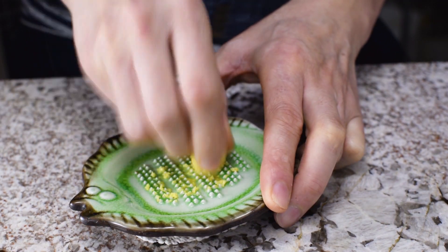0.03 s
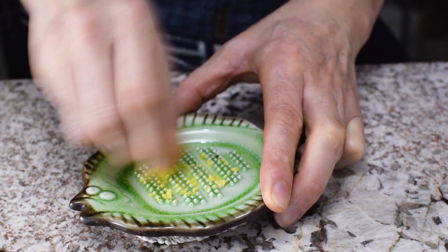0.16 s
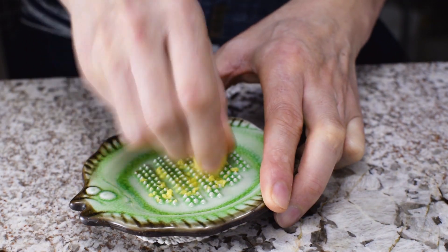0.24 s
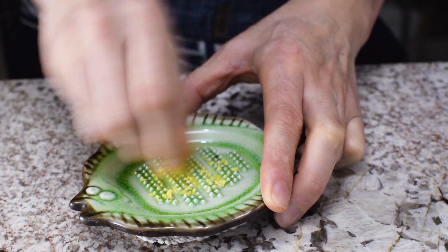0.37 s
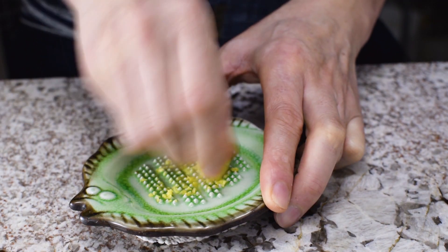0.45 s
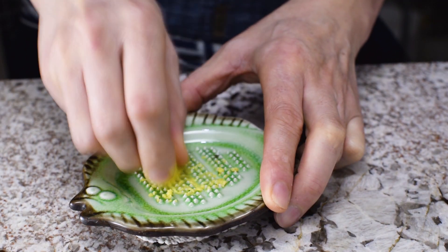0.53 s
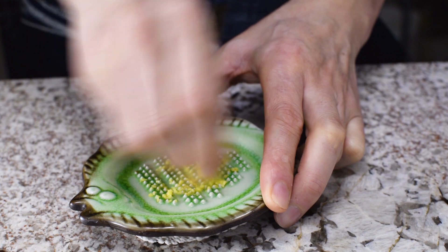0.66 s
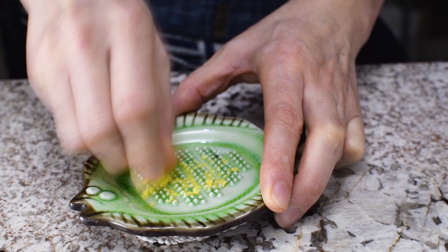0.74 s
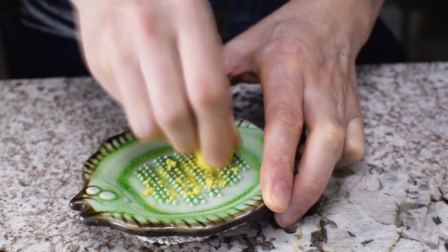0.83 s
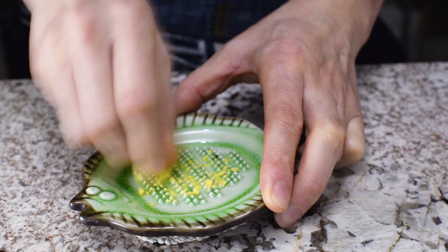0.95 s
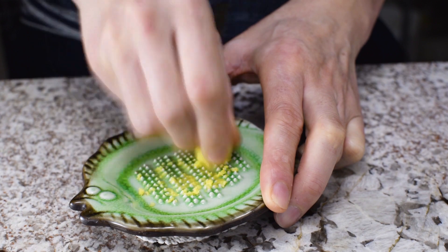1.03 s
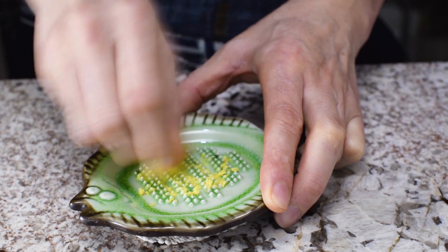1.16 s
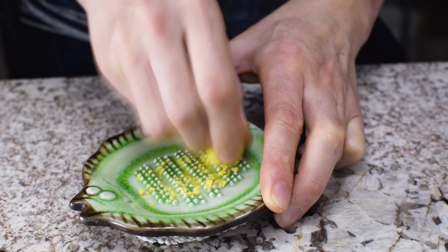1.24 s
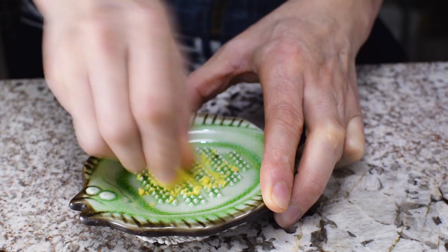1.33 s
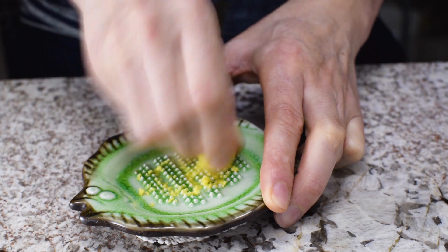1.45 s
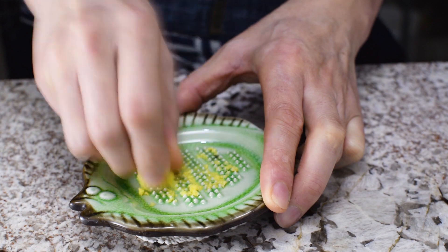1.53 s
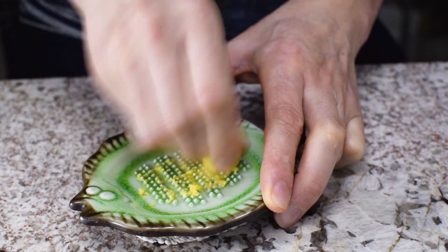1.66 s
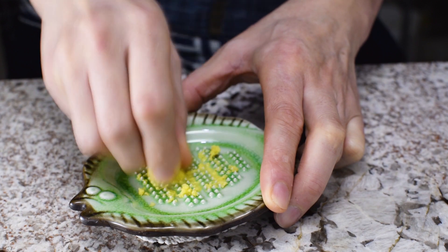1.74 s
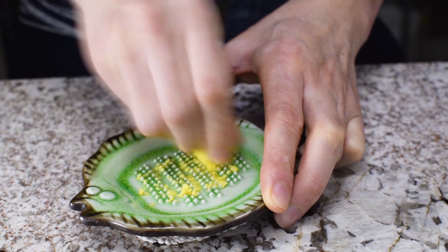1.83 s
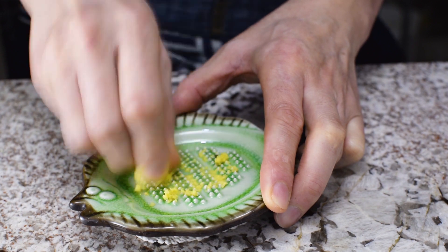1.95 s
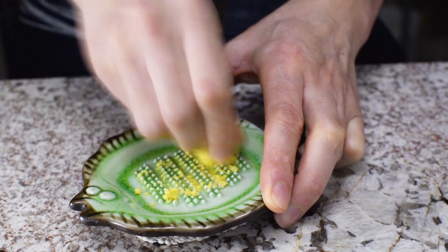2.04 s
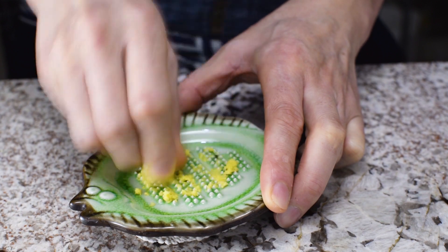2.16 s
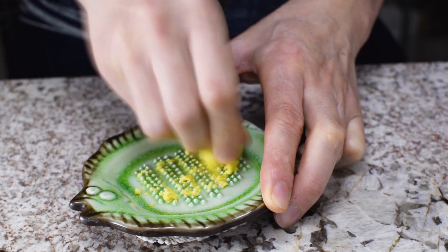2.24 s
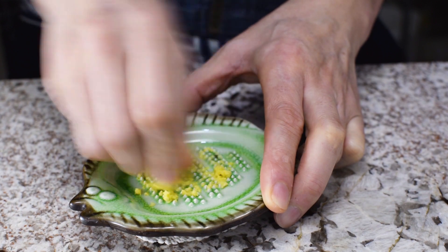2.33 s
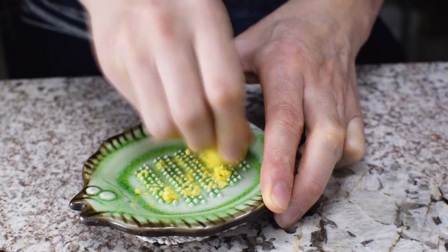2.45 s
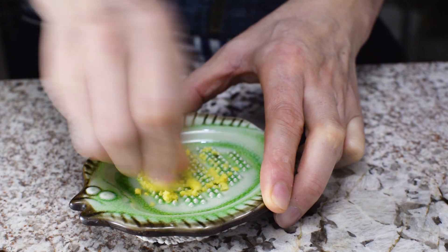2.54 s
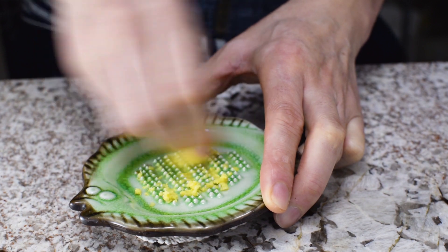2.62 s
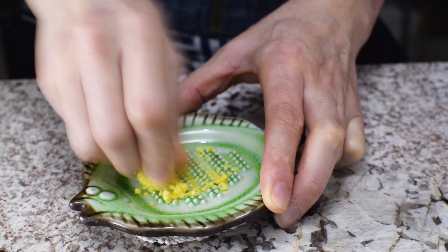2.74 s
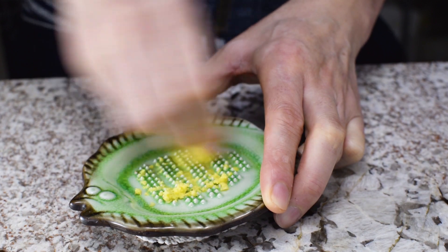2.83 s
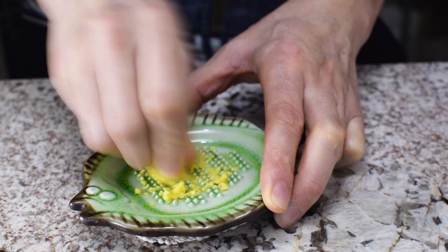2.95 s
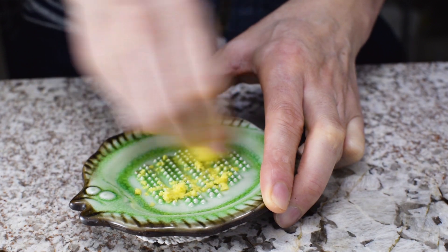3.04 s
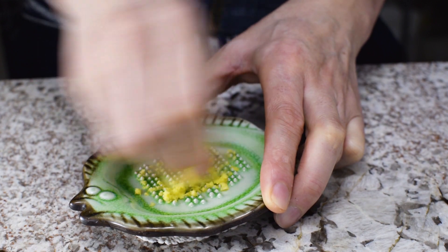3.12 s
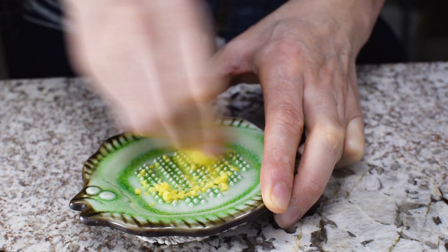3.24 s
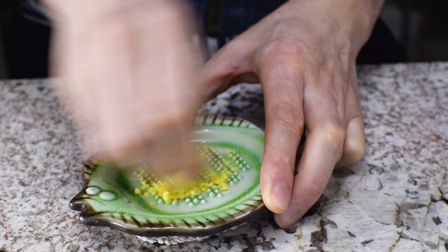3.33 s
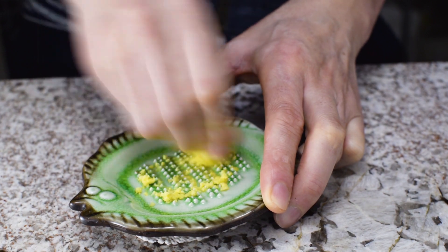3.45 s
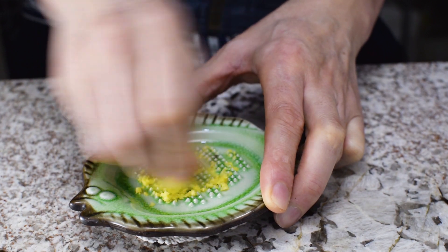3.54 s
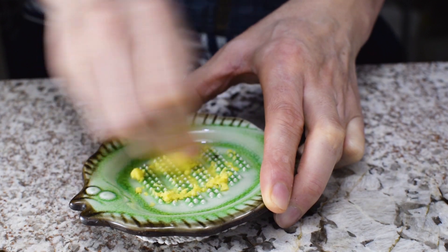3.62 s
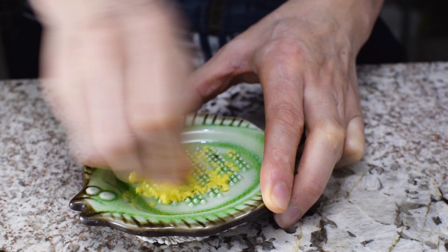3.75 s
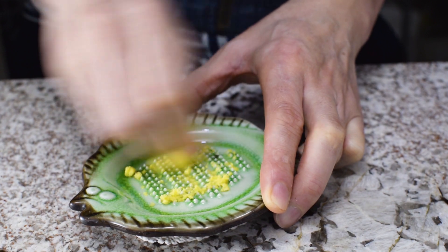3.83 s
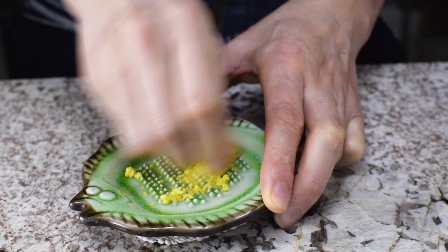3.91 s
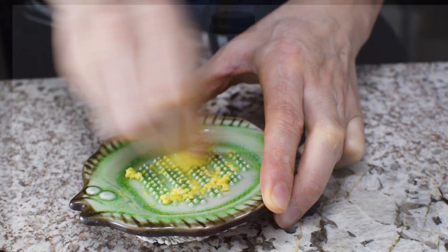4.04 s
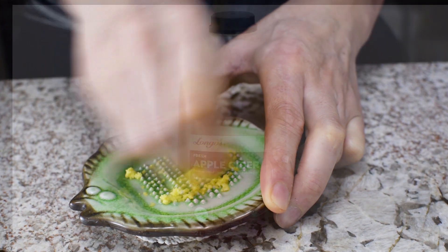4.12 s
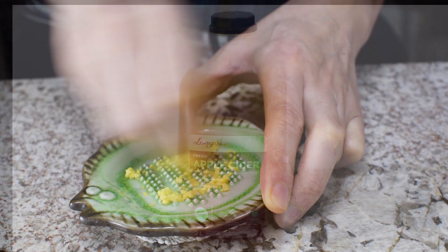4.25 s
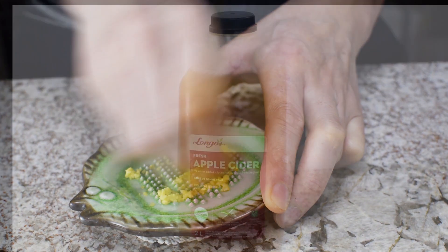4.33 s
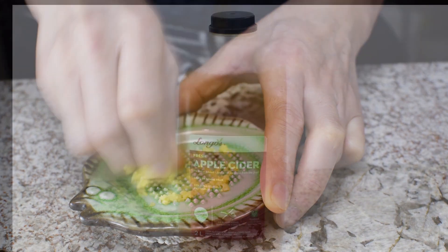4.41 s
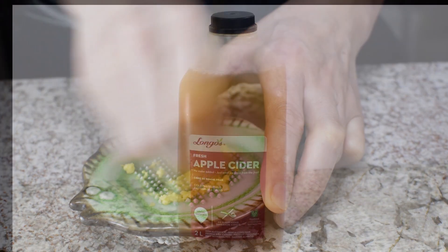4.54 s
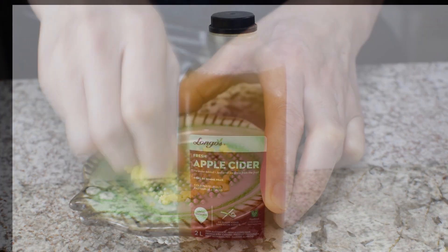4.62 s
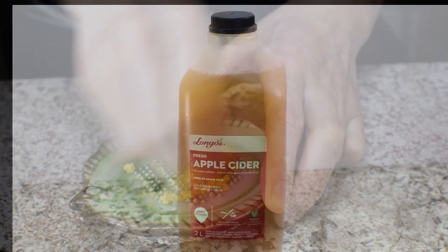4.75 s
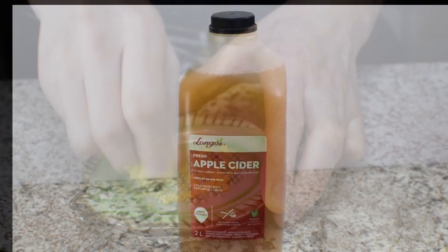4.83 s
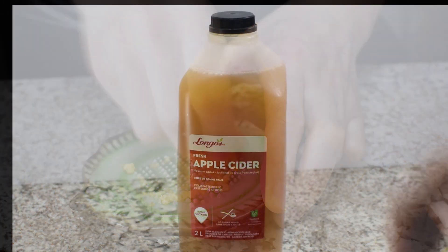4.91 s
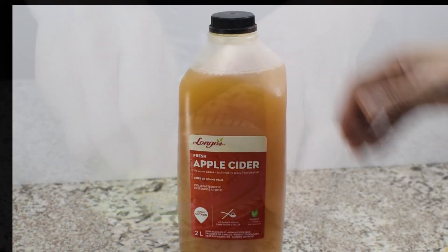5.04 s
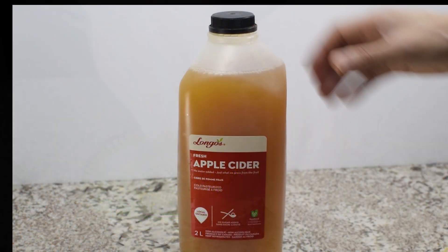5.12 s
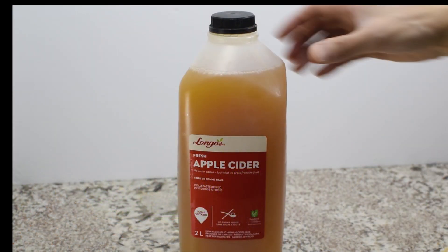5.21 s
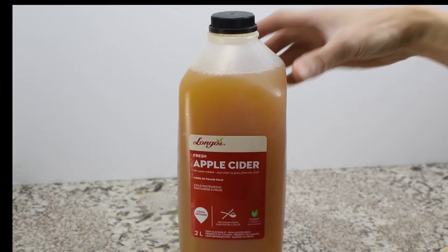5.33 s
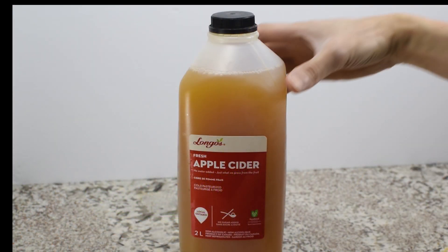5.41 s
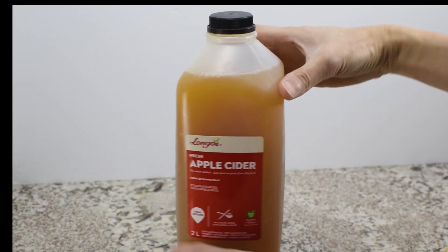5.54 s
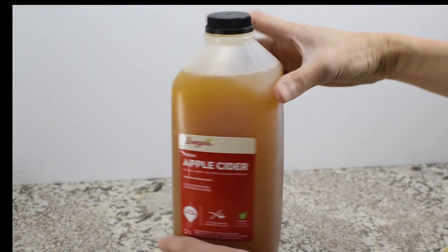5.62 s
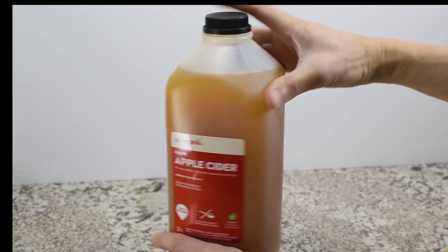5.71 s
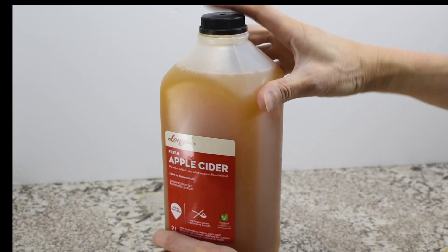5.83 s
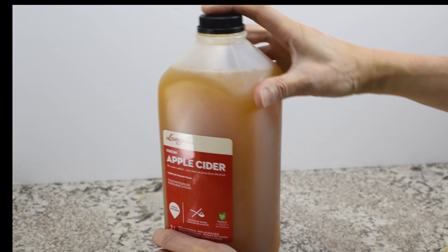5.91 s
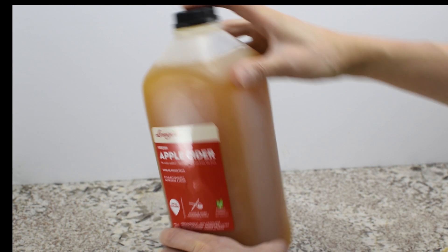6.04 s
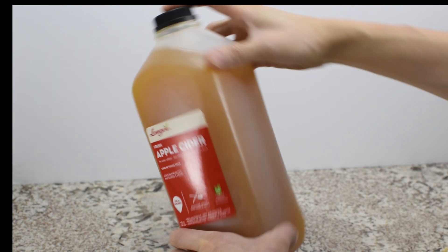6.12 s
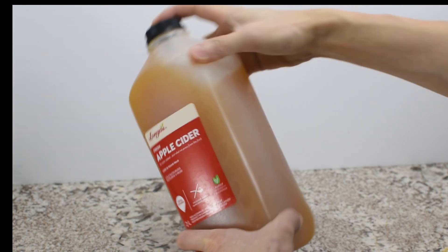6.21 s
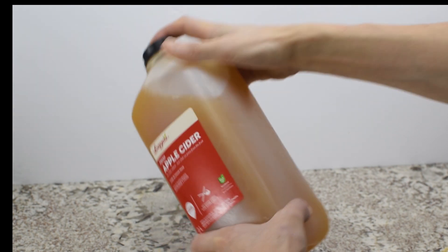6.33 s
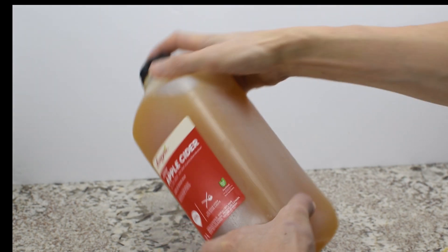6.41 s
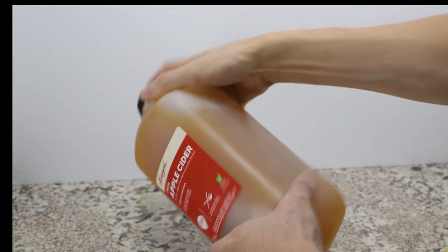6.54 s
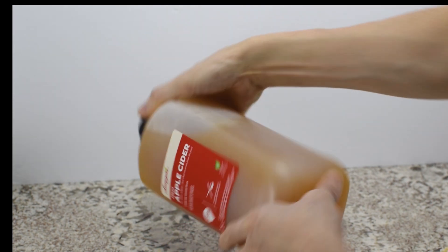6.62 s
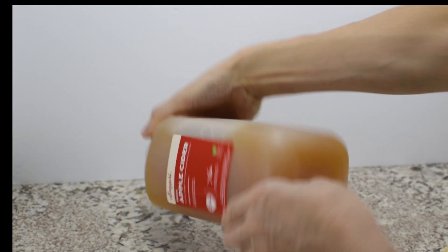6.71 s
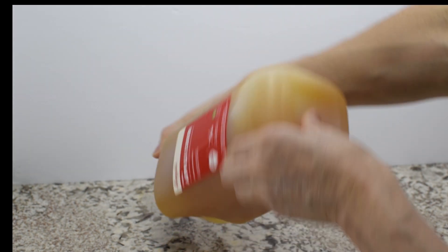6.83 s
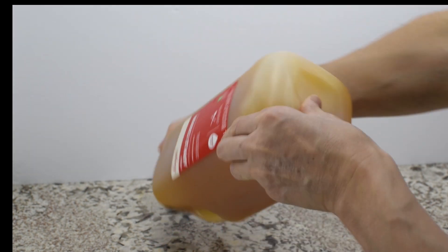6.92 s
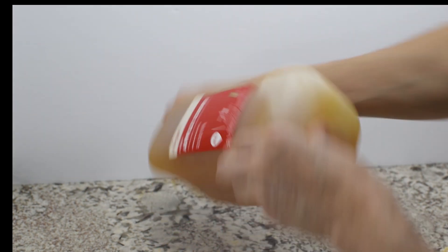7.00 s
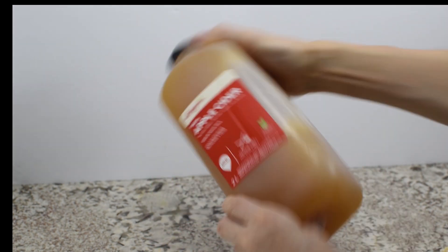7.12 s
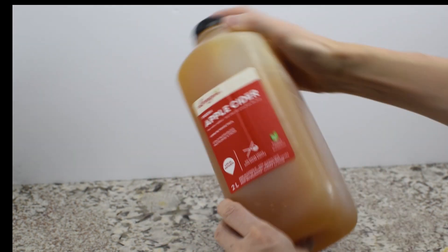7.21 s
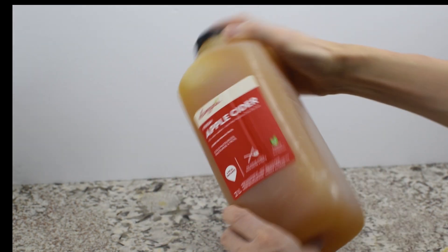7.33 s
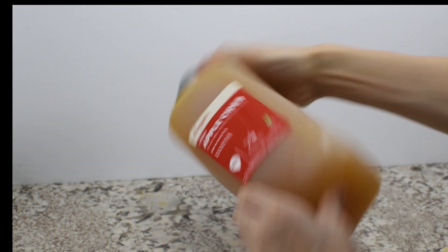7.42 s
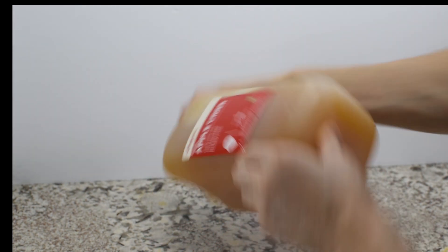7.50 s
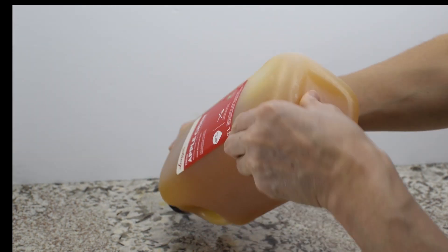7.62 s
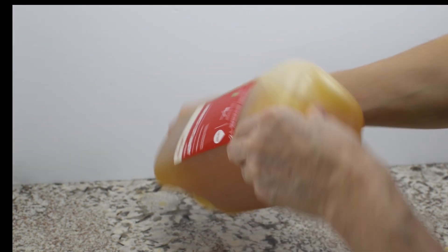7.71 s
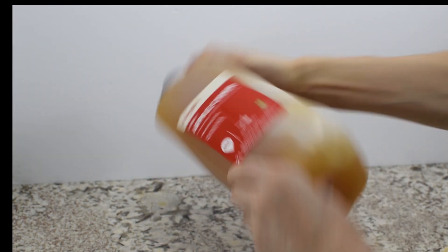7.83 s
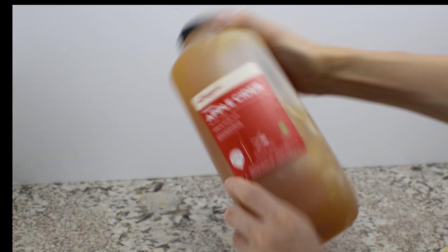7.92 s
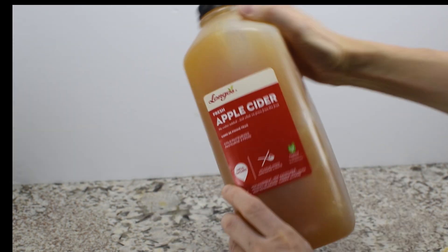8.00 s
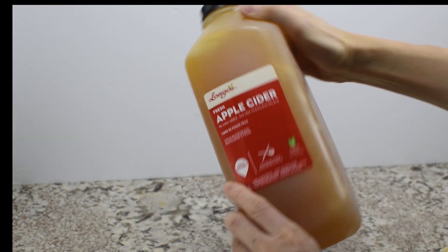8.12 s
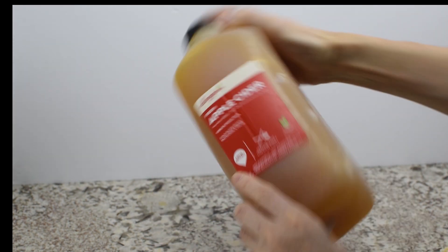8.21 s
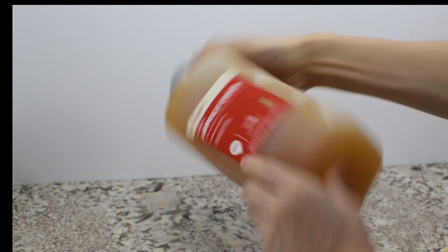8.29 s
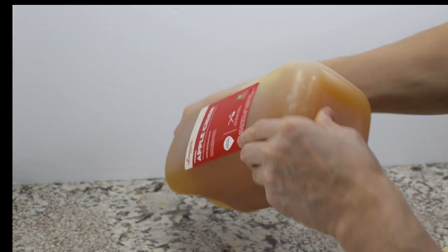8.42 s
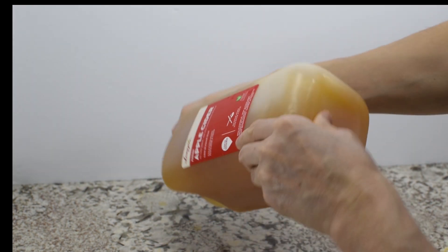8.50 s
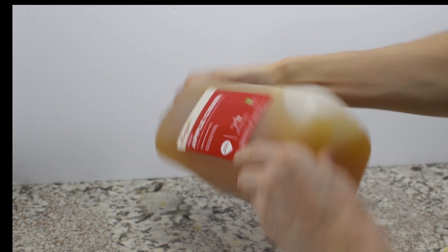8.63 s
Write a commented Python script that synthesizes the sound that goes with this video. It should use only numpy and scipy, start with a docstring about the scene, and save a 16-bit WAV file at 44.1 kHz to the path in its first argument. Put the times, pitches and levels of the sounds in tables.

```python
"""Grating ginger, then shaking cider

Ginger is rubbed quickly to and fro on a ceramic grater: noise and crackle make the tearing fibres,
resonances make the ringing and juddering dish, and clouds of small damped tones make the wet fizz.
The scene then changes abruptly to a quiet kitchen, where a plastic jug of cider is tipped over and shaken:
rising damped tones gulp and pop, noise bursts slap the walls, and swells of crackle make the spray.
A soft ventilation rumble of shaped noise runs under both."""
import sys
import numpy as np
from scipy import signal
from scipy.fft import rfft, irfft, next_fast_len
from scipy.io import wavfile
from scipy.ndimage import uniform_filter1d, map_coordinates

SR = 44100
rng = np.random.default_rng(int(sys.argv[2]) if len(sys.argv) > 2 else 0)


def bounce(signal):
    """Save signal as a 16-bit WAV file at the path given by the first command-line argument."""
    frames = np.transpose(np.atleast_2d(signal))
    limited = np.clip(frames, -1, 1)
    pcm = np.round(limited * 32767).astype(np.int16)
    wavfile.write(sys.argv[1], SR, pcm)


N = 381906
TOP_HZ = 15900  # nothing sounds above this
CHANGE_S = 4.612  # the grating has stopped by this time


def amp(db):
    """Decibels to gain."""
    return 10 ** (np.asarray(db) / 20)


def unit(x):
    """Scale x to an rms (average strength) of 1."""
    return x / np.sqrt(np.mean(x ** 2) + 1e-20)


def clock():
    """Time of every sample in seconds."""
    return np.arange(N) / SR


def along(points, hz):
    """Read a curve of (Hz, value) points, joined by straight lines on a log pitch axis."""
    f, v = np.transpose(points)
    return np.interp(np.log(hz + 1), np.log(f + 1), v)


def wobble(rate):
    """A smooth random curve with rate random points a second."""
    knots = rng.standard_normal(int(N * rate / SR) + 4)
    return map_coordinates(knots, [clock() * rate])


def filtered(x, response):
    """Multiply the spectrum of x by a response that depends on frequency."""
    size = 2 * next_fast_len((N + SR // 2) // 2)
    hz = np.fft.rfftfreq(size, 1 / SR)
    return irfft(rfft(x, size) * response(hz), size)[..., :N]


def coloured(x, spectrum):
    """Give x a (Hz, dB) tone colour without smearing it backwards in time."""
    def response(hz):
        cepstrum = irfft(np.log(amp(along(spectrum, hz)) + 1e-6))
        # folding the cepstrum forwards makes the filter act only after each sound
        cepstrum[1:len(hz) - 1] *= 2
        cepstrum[len(hz):] = 0
        return np.exp(rfft(cepstrum))
    return filtered(x, response)


def resonate(x, modes):
    """Let x ring a body with (Hz, width Hz, dB) resonances of alternating sign."""
    def response(f):
        total = 0
        for k, (centre, width, db) in enumerate(modes):
            damping = 1j * f * width
            total = total + (-1) ** k * amp(db) * damping / (centre * centre - f * f + damping)
        return total
    return filtered(x, response)


def add(track, s, sound):
    """Mix a sound into the track at time s."""
    start = max(round(s * SR), 0)
    track[start:start + len(sound)] += sound[:max(N - start, 0)]


def crackle(rate, spread_db):
    """Random clicks of uneven size, about rate a second, rms 1."""
    sizes = amp(spread_db * np.clip(rng.standard_normal(N), -2, 2)) * rng.choice([-1, 1], N)
    return unit(sizes * (rng.random(N) < rate / SR))


def ping(t, hz, t60, attack, glide):
    """A bubble: a damped sine whose pitch rises as it dies by 60 dB in t60."""
    tone = np.sin(2 * np.pi * hz * t * (1 + glide * np.minimum(t / t60, 1)))
    return tone * 10 ** (-3 * t / t60) * (1 - np.exp(-t / attack))


def fizz(count, hz, octaves, cycles, spread_db):
    """A cloud of small bubbles at random times and pitches, rms 1."""
    t = np.arange(600) / SR
    pitch, size = np.clip(rng.standard_normal((count, 2)), -2, 2).T[:, :, None]
    pitch = np.minimum(hz * 2 ** (octaves * pitch), TOP_HZ)
    grains = amp(spread_db * size) * ping(t, pitch, cycles / pitch, 1 / pitch, 0.075)
    places = rng.integers(0, N, (count, 1)) + np.arange(len(t))
    return unit(np.bincount(places.ravel(), grains.ravel(), N)[:N])


def pops(rows, cycles, glide, scatter_db):
    """Single bubbles, each ringing for some cycles and shedding four fainter ones, lower or higher."""
    out, t = np.zeros(N), np.arange(SR // 20) / SR
    for s, db, hz in rows:
        pop = ping(t, hz, cycles / hz, 2 / hz, glide)
        add(out, s, amp(db) * pop / np.abs(pop).max())
        for late, octave in rng.random((4, 2)):
            pitch = min(hz * 2 ** (1.51 * octave - .55), TOP_HZ)
            small = ping(t, pitch, cycles / pitch, 1 / pitch, glide)
            add(out, s + 0.013 * late ** 2, amp(db + scatter_db) * small)
    return out


def burst(t60):
    """A short crack of noise that dies by 60 dB in t60."""
    t = np.arange(SR // 20) / SR
    return rng.standard_normal(len(t)) * 10 ** (-3 * t / t60)


def echoes(x, decay, delay):
    """Blurred reflections: x spread over a dying noise tail of unit energy."""
    hz, t, z = signal.stft(rng.standard_normal(SR // 2), SR, nperseg=256)
    dying = z * amp(-60 * t / along(decay, hz)[:, None])
    tail = signal.istft(dying, SR, nperseg=256)[1]
    tail = np.pad(tail / np.linalg.norm(tail), (round(delay * SR), 0))
    return signal.fftconvolve(x, tail)[:N]


def shifting_echoes(x, decay, rate, count):
    """Reflections off moving surfaces: several echo patterns fade in and out."""
    shares = np.array([wobble(rate) for _ in range(count)])
    shares /= np.linalg.norm(shares, axis=0)
    return sum(share * echoes(x, decay, delay=.0004) for share in shares)


def patchy(x, depth_db):
    """The colour flickers: each region of pitch swells on its own."""
    z = signal.stft(x, nperseg=256)[2]
    smoothing = np.outer(np.hanning(9), np.hanning(17))
    field = signal.fftconvolve(rng.standard_normal(z.shape), smoothing, "same")
    return signal.istft(z * amp(depth_db * unit(field)), nperseg=256)[1][:N]


def stereo(mid, side):
    """Left and right from the shared middle and the difference between the sides."""
    return np.array([mid + side, mid - side])


# tone colour of the ventilation: (pitch [Hz], relative level [dB])
VENTILATION_COLOUR = [(4.7, -39.5), (8.0, 5.5), (19, 0.5), (38, -16), (69, -11), (139, -21), (169, -19),
                      (211, -22.5), (289, -26), (339, -27), (466, -28.5), (620, -32), (1250, -37.5),
                      (3230, -47.5), (15800, -58.5)]
# how wide it sounds: (pitch [Hz], side level against the middle [dB])
VENTILATION_WIDTH = [(20, -31.5), (45, -18), (70, -12.5), (110, -7.5), (160, -11), (500, -8.5), (900, -12),
                     (4000, -6.5), (9000, -6)]


def ventilation():
    """Moving air: steady noise shaped into a soft rumble with a little hiss."""
    mid, side = (unit(coloured(noise, VENTILATION_COLOUR)) for noise in rng.standard_normal((2, N)))
    side = filtered(side, lambda hz: amp(along(VENTILATION_WIDTH, hz)))
    return amp(-39.0) * stereo(mid, side)


# fingers touching the plastic: (time [s], level [dB], time to fade by 20 dB [s])
FINGER_TOUCHES = [(5.417, -54.5, 0.058), (5.48, -66, 0.38), (5.55, -71, 0.41), (6.28, -61, .02),
                  (6.345, -60, .05)]


def fingers():
    """Skin brushes the jug as the hands take hold: fine crackle that starts at once and fades."""
    touch = np.zeros(N)
    for s, db, fade in FINGER_TOUCHES:
        touch += amp(db - 20 * np.abs(clock() - s) / fade) * (clock() > s)
    colour = [(600, -6), (1400, 2), (2600, 2), (6000, -6), (15000, -27)]
    return touch * unit(coloured(crackle(rate=3000, spread_db=2), colour))


# air pockets gulping through the liquid: (time [s], level [dB], pitch [Hz])
AIR_GULPS = [(6.647, -37, 437), (6.649, -32, 1050), (7.072, -27.5, 228), (7.074, -26.5, 647),
             (7.074, -28.5, 300), (7.081, -29.5, 795), (7.083, -29.5, 1080), (7.089, -29.5, 196),
             (7.091, -26, 605), (7.531, -29, 1190), (7.92, -30, 656), (7.929, -31.5, 527),
             (8.368, -31.5, 206), (8.378, -29, 312), (8.455, -37, 1024), (8.629, -35, 640),
             (8.633, -41, 1650)]
# bubbles and drops in the jug: (time [s], relative level [dB], pitch [Hz])
SMALL_DROPS = [(6.651, -21.5, 4000), (6.8366, -39, 5400), (6.91, -30.5, 3540), (7.0888, -23.5, 3800),
               (7.1014, -20, 4100), (7.1354, -22, 2660), (7.4849, -31, 2410), (7.503, -25, 1340),
               (7.5715, -15.5, 3650), (7.582, -29, 1980), (7.65, -28, 2590), (7.662, -36, 1730),
               (7.854, -32, 2910), (7.903, -25, 1740), (8.1469, -30.5, 4500), (8.2387, -25, 5160),
               (8.328, -26.5, 4600), (8.4194, -23, 3280), (8.4835, -21.5, 2610), (8.5276, -32, 4030),
               (8.5626, -34.5, 5500), (8.6078, -29.5, 8900)]
GULP_T60_S, GULP_REF_HZ, GULP_SLOPE = 0.072, 600, 0.37  # larger, lower pockets ring longer


def bubbles():
    """Large air pockets gulp as low damped tones; small bubbles and drops plink."""
    gulps, t = np.zeros(N), np.arange(SR // 4) / SR
    for s, db, hz in AIR_GULPS:
        t60 = GULP_T60_S * (GULP_REF_HZ / hz) ** GULP_SLOPE
        add(gulps, s, amp(db) * ping(t, hz, t60, attack=0.00053, glide=0.014))
    drops = amp(-3) * pops(SMALL_DROPS, cycles=26, glide=0.035, scatter_db=-5.5)
    reflected = amp(-9) * echoes(drops, [(1500, 0.047), (8000, 0.025)], delay=0.001004)
    return gulps + drops + reflected


# sharp slaps on the plastic: (time [s], relative level [dB], pitch [Hz], extra level of the crack [dB])
WALL_SLAPS = [(6.6481, -15, 2610, -2.5), (7.114, -7.5, 3040, -8), (7.5364, -22, 4340, 9.5),
              (7.927, -9, 3800, -11), (8.0271, -12.5, 2580, -2.5), (8.3689, -11, 3180, -3.5)]
# tone colour of slaps and spray: (pitch [Hz], relative level [dB])
SPRAY_COLOUR = [(700, -45), (1300, -5.5), (1900, -5), (2500, 0), (3800, -2), (4800, -2), (7000, -6),
                (10500, -14.5), (12000, -23), (15500, -42)]


def slaps():
    """Liquid meets the wall flat on: a crack of noise and a pitched pop."""
    cracks = np.zeros(N)
    for s, db, hz, crack_db in WALL_SLAPS:
        add(cracks, s, amp(db + crack_db) * burst(t60=0.031))
    pitched = pops([row[:3] for row in WALL_SLAPS], cycles=15.0, glide=0.025, scatter_db=-15)
    return coloured(cracks, SPRAY_COLOUR) + amp(-6.0) * pitched


# waves of cider hitting the jug: (time [s], relative crest level [dB], time to rise by 20 dB [s],
# level of the low part against the crest [dB], level of the fine mist against the crest [dB])
CIDER_WAVES = [(6.649, -35, 0.017, -17, -7), (7.082, -39.5, 0.017, 12, -32),
               (7.119, -27, 0.019, -11.5, -29), (7.512, -29, 0.016, -7.5, -32),
               (7.538, -33.5, 0.038, 2, -19), (7.585, -42, 0.021, 4, -34), (7.628, -41.5, 0.012, -11, -30),
               (7.805, -46, 0.0085, 3, -30), (7.901, -31.5, 0.007, -1.5, -29), (7.928, -28, 0.022, -3, -28),
               (8.371, -25.5, 0.038, -7.5, -26), (8.63, -46.5, 0.067, 2.5, -18)]
# tone colour of the mist: (pitch [Hz], relative level [dB])
MIST_COLOUR = [(2000, -23), (6000, -2), (11000, 0), (15500, -13)]
# resonances of the hollow jug: (pitch [Hz], width [Hz], relative level [dB])
JUG_HOLLOW = [(225, 75, -6), (460, 180, 1), (624, 103, 7), (1000, 320, -1), (1550, 260, -7)]
WAVE_FALL_S = 0.036  # a wave dies by 20 dB in this time
SETTLE_S = 0.15  # stray bubbles keep bursting after a wave and fade by 20 dB in this time


def waves():
    """Each wave breaks into spray and foam; heavy ones fold in air, which gurgles and keeps bursting."""
    splash, weight, fineness, settling = np.zeros((4, N))
    for s, db, rise, low_db, mist_db in CIDER_WAVES:
        t = clock() - s
        swell = amp(db - 20 * np.where(t < 0, -t / rise, t / WAVE_FALL_S))
        splash += swell
        weight += swell * amp(low_db)
        fineness += swell * amp(mist_db)
        settling += amp(db + low_db - 20 * np.where(t < 0, -t / rise, t / SETTLE_S))
    flicker = amp(-8.5 + 4.5 * wobble(170))
    spray = flicker * unit(coloured(crackle(rate=3000, spread_db=1.0), SPRAY_COLOUR))
    foam = amp(-6.5) * fizz(count=3200, hz=2976, octaves=0.333, cycles=22, spread_db=-1)
    mist = unit(coloured(crackle(rate=3500, spread_db=6), MIST_COLOUR))
    gurgle = amp(-8) * fizz(count=2600, hz=1654, octaves=0.4, cycles=20, spread_db=4)
    hollow = amp(-6) * unit(resonate(crackle(rate=1500, spread_db=3.5), JUG_HOLLOW))
    stray = amp(-14.0) * fizz(count=1800, hz=2600, octaves=0.5, cycles=33, spread_db=5.5)
    return splash * (spray + foam) + fineness * mist + weight * (hollow + gurgle) + settling * stray


# how long the kitchen rings: (pitch [Hz], time to die by 60 dB [s])
KITCHEN_DECAY = [(200, 0.23), (1000, 0.3), (2700, 0.22), (6000, 0.23), (14000, 0.17)]


def jug():
    """The shaken cider and the hands, with reflections from the kitchen and the counter."""
    direct = waves() + slaps() + bubbles() + fingers()
    room = amp(-5.5) * shifting_echoes(direct, KITCHEN_DECAY, rate=3, count=2)
    walls = amp(-6.5) * shifting_echoes(direct, KITCHEN_DECAY, rate=3, count=3)
    counter = amp(-5.5) * shifting_echoes(direct, [(1000, 0.012), (8000, 0.011)], rate=6, count=3)
    width = [(200, -1), (900, -7.5), (2300, -0.5), (4500, 0), (10000, 1)]
    return stereo(direct + room, coloured(walls + counter, width))


# one to-and-fro of the root per row: (start [s], relative scrape level of the push [dB], of the pull [dB],
# relative judder level of the push [dB], of the pull [dB])
HAND_STROKES = [(-0.15, -20, -35.5, -36, -37), (0.084, -36, -34, -39, -36.5),
                (0.279, -35, -35.5, -39, -37.5), (0.48, -36, -36.5, -38.5, -39),
                (0.677, -34.5, -34, -37.5, -34.5), (0.879, -35, -33, -38.0, -37.5),
                (1.082, -34.5, -33, -39.5, -36.5), (1.286, -33.5, -33.5, -37.5, -36),
                (1.486, -34, -32.5, -38, -31.5), (1.689, -35.5, -34.5, -38.5, -35.5),
                (1.89, -34.5, -33, -36, -35), (2.092, -34.5, -35.5, -39.5, -34.5),
                (2.298, -35, -35.5, -38.5, -36.5), (2.504, -33, -34.5, -38, -35),
                (2.703, -33, -34, -37.5, -35), (2.908, -33.5, -34.5, -39, -34.5),
                (3.107, -34, -34.5, -41, -36), (3.318, -33, -35, -41, -32.5),
                (3.518, -33.5, -34.5, -39.0, -33), (3.722, -33.5, -33, -40.0, -33.5),
                (3.924, -33.5, -33.5, -38.0, -39), (4.135, -35, -34, -39, -35.5),
                (4.343, -33, -33, -39.5, -35.5), (4.542, -36, -35, -37, -37.0)]
PUSH_SHARE = 0.59  # part of each to-and-fro spent pushing; the pull back is quicker
PRESS_S, LIFT_S, LIFTED_DB = 0.023, 0.032, -2.3  # pressed down at the start, eased off at the end
BITE_S, BITE_WIDTH_S, BITE_DB = 0.027, 0.011, 2.5  # it catches on the first teeth of each push


def hand():
    """The to-and-fro: progress through the stroke 0-1, pushing or not, and pressure, scrape, judder in dB."""
    start_s, push_db, pull_db, push_judder_db, pull_judder_db = np.transpose(HAND_STROKES)
    length_s = np.append(np.diff(start_s), np.diff(start_s).mean())
    row = np.maximum(np.searchsorted(start_s, clock(), "right") - 1, 0)
    since_s = clock() - start_s[row]
    left_s = length_s[row] - since_s
    phase = np.clip(since_s / length_s[row], 0, 1)
    pushing = phase < PUSH_SHARE
    progress = np.where(pushing, phase / PUSH_SHARE, (phase - PUSH_SHARE) / (1 - PUSH_SHARE))
    pressed = np.clip(np.minimum(since_s / PRESS_S, left_s / LIFT_S), 0, 1)
    bite_db = BITE_DB * np.exp(-((since_s - BITE_S) / BITE_WIDTH_S) ** 2)
    pressure_db = LIFTED_DB * (1 - pressed) + bite_db

    def smooth_levels(push, pull):
        """Each stroke's own level, with the steps rounded over 10 ms."""
        return uniform_filter1d(np.where(pushing, push[row], pull[row]), size=SR // 100)

    scrape_db = smooth_levels(push_db, pull_db)
    judder_db = smooth_levels(push_judder_db, pull_judder_db)
    return progress, pushing, pressure_db, scrape_db, judder_db


# tone colour of tearing fibres: (pitch [Hz], relative level [dB])
TEARING_COLOUR = [(400, -21), (700, -8.5), (1050, -6), (1350, -15), (2150, -9.5), (2750, -6.5),
                  (3050, -1.5), (3800, 3.5), (4600, -3.5), (7400, -0.5), (10500, -4), (12800, -2.5),
                  (15500, -8)]
# ring of the ceramic: (pitch [Hz], width [Hz], relative level [dB])
CERAMIC_RING = [(1698, 91, -2), (3205, 190, 3.5), (3680, 1000, -8), (4060, 300, -21.5), (4950, 240, -1),
                (7160, 71, 7.5), (12200, 220, -2)]
# resonances of the dish on the counter: (pitch [Hz], width [Hz], relative level [dB])
DISH_RESONANCES = [(79, 33.8, -7), (157.8, 28.9, 0), (203.5, 47.4, -9), (301.5, 46, -13), (621, 33, -21.5)]
# juice bubbles bursting under the root: (time [s], relative level [dB], pitch [Hz])
JUICE_BUBBLES = [(1.3942, -20, 6950), (1.4454, -12, 12200), (1.7933, -23, 6470), (2.0694, -21.5, 7600),
                 (2.141, -14, 6750), (4.3088, -11, 3800)]
# tough fibres snapping: (time [s], relative level [dB])
FIBRE_SNAPS = [(0.331, -23), (0.7503, -18.5), (1.199, -25.5), (1.3244, -22), (1.7944, -22), (2.2003, -20.5),
               (2.357, -20), (3.6926, -22.5), (3.962, -19)]
# how wide the reflections sound: (pitch [Hz], side level [dB])
GRATER_WIDTH = [(60, -6), (160, -20), (300, -11.5), (800, -20), (2000, -21), (2600, -3.5), (3300, -11.5),
                (5000, -4.5), (9000, -4.5), (12500, -6)]
LATE_PEAK = 1.45  # above 1, the hand is fastest late in a stroke
EARLY_PEAK = 0.95  # below 1, the dish is dragged hardest early in a stroke
SCRAPE_DB, SCRAPE_SPEED_DB = -2, 5  # change at full speed; further loss at a standstill
TREBLE_DB, TREBLE_SPEED_DB = -2.5, 6.5  # extra treble gain at full speed; how much it rises at a standstill
JUICE_DB, JUICE_PUSH_DB = -2, 18.5  # wet fizz at the height of the push; loss away from it
JUDDER_SPEED_DB = 3.5  # how much weaker the judder is at the turns than at full drag


def grating():
    """Each stroke tears fibres on rows of teeth and shakes the dish; the push squeezes out the most juice."""
    progress, pushing, pressure_db, scrape_db, judder_db = hand()
    speed = np.sin(np.pi * progress ** LATE_PEAK)
    drag = np.sin(np.pi * progress ** EARLY_PEAK)
    eased_db = np.minimum(pressure_db, 0)
    stroke_db = scrape_db + SCRAPE_DB + pressure_db - SCRAPE_SPEED_DB * (1 - speed)
    # the root catches and slips on the teeth
    force = amp(stroke_db + 1.8 * wobble(200) + 0.52 * wobble(40))

    fibres = amp(-3.0) * crackle(rate=1800, spread_db=0.5) + amp(-4.5) * rng.standard_normal(N)
    rasp = amp(-1.25) * unit(patchy(coloured(fibres, TEARING_COLOUR), depth_db=2.5))
    # the point of contact travels, so the ringing tones take turns
    ring = sum(amp(5.0 * wobble(22.12)) * resonate(fibres, [mode]) for mode in CERAMIC_RING)
    ring = amp(-13) * unit(ring)
    juice_db = JUICE_DB - JUICE_PUSH_DB * (1 - speed * pushing)
    wet = amp(juice_db) * fizz(count=9000, hz=7430, octaves=0.2, cycles=19, spread_db=6.0)
    # single fibres parting
    tick_colour = [(1000, -23), (2400, -28), (3200, 11.5), (9000, 1), (15500, -5.5)]
    ticks = amp(-13) * unit(coloured(crackle(rate=50, spread_db=0), tick_colour))
    scrape = force * (rasp + ring + wet + ticks)

    treble = filtered(scrape, lambda hz: hz ** 4 / (hz ** 4 + 6000 ** 4))
    # the treble dies away further when the root is eased off
    treble_db = TREBLE_DB + TREBLE_SPEED_DB * (1 - speed) + eased_db + 0.37 * wobble(35)
    scrape = scrape + treble * (amp(treble_db) - 1)

    snaps = np.zeros(N)
    for s, db in FIBRE_SNAPS:
        add(snaps, s, amp(db - 6.5) * burst(t60=0.012))
    snaps = coloured(snaps, [(800, -25), (2200, -10.0), (3200, 7), (8000, 4), (15500, -5)])
    bursts = amp(-1.5) * pops(JUICE_BUBBLES, cycles=16, glide=0.015, scatter_db=-41) + snaps
    bursts = bursts + amp(-0.5) * echoes(bursts, [(3000, 0.011), (12000, 0.045)], delay=0.00096)

    # the teeth rock the dish
    bumps = crackle(rate=400, spread_db=-1.0)
    rocking = amp(judder_db + eased_db - JUDDER_SPEED_DB * (1.5 - drag))
    judder = rocking * unit(resonate(bumps, DISH_RESONANCES))

    direct = scrape + bursts + judder
    around = shifting_echoes(direct, [(200, 0.14), (3000, 0.053), (12000, 0.059)], rate=10, count=4)
    return stereo(direct, filtered(around, lambda hz: amp(along(GRATER_WIDTH, hz))))


def scene():
    """The grating stops dead when the scene changes; the ventilation runs throughout."""
    at_grater = np.clip((CHANGE_S - clock()) / .003, 0, 1)
    return ventilation() + jug() + at_grater * grating()


def record(dry):
    """Nothing is kept above the band limit."""
    return filtered(dry, lambda hz: hz < TOP_HZ)


dry = scene()
out = record(dry)
bounce(out)
```